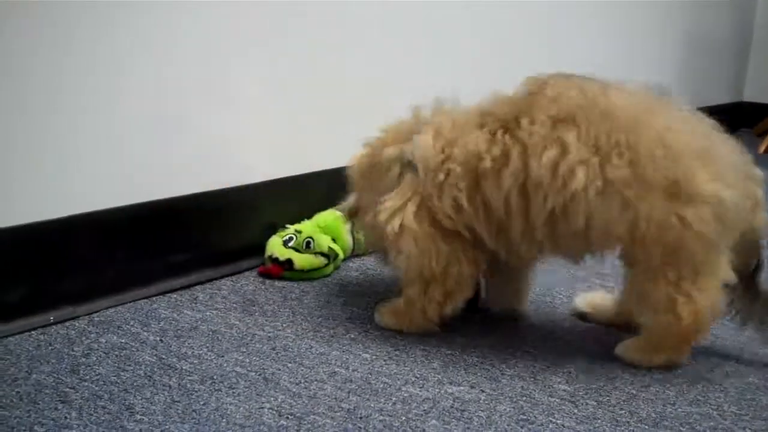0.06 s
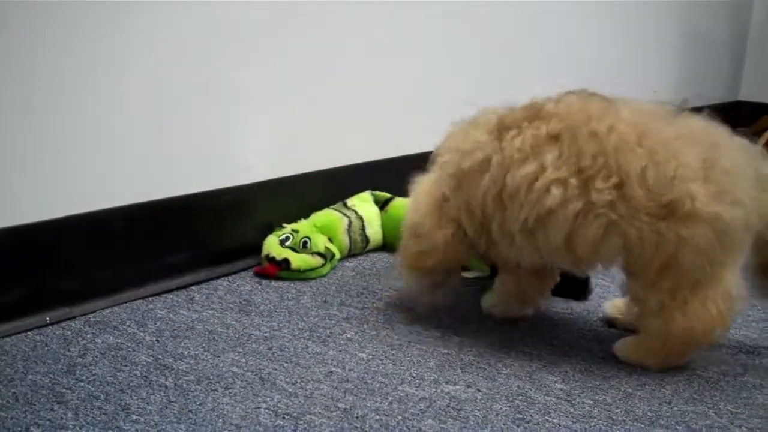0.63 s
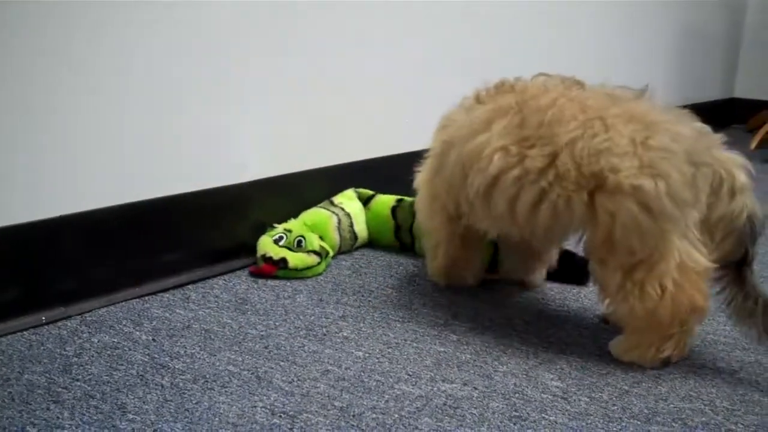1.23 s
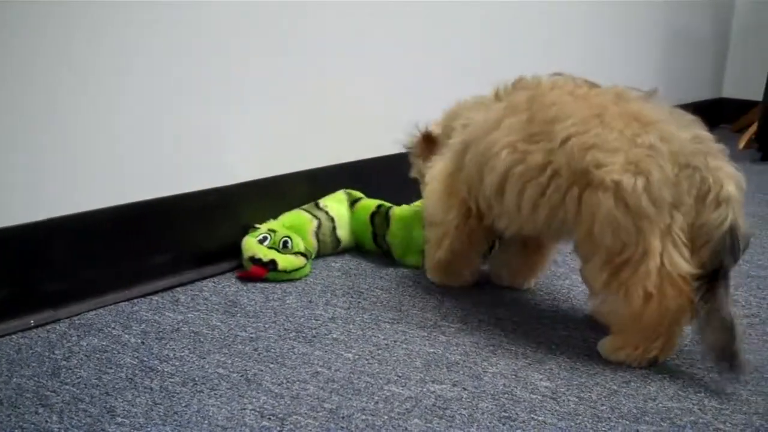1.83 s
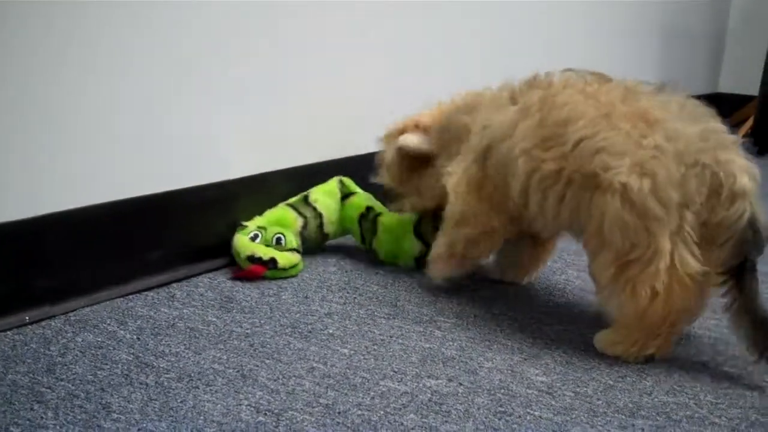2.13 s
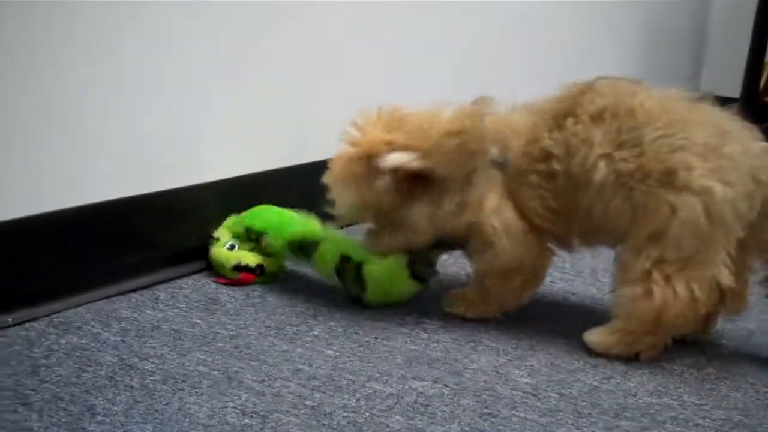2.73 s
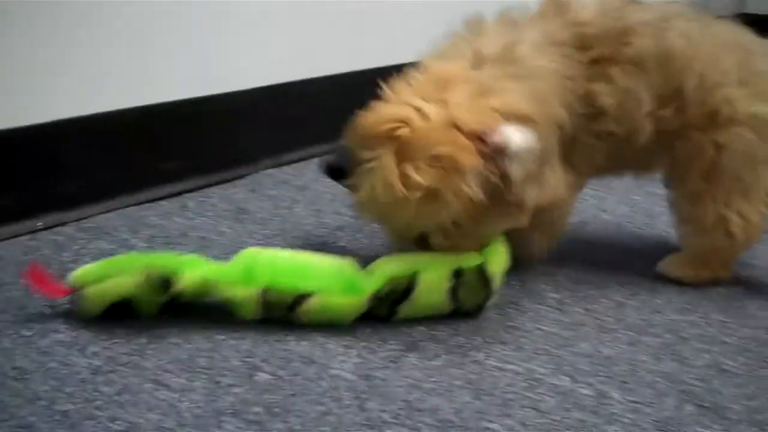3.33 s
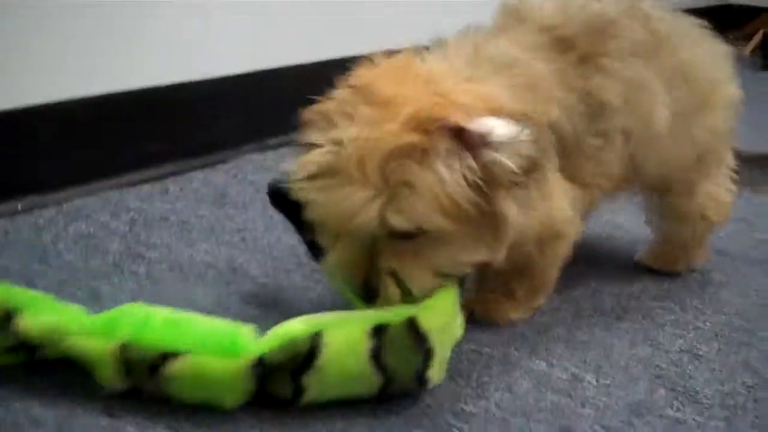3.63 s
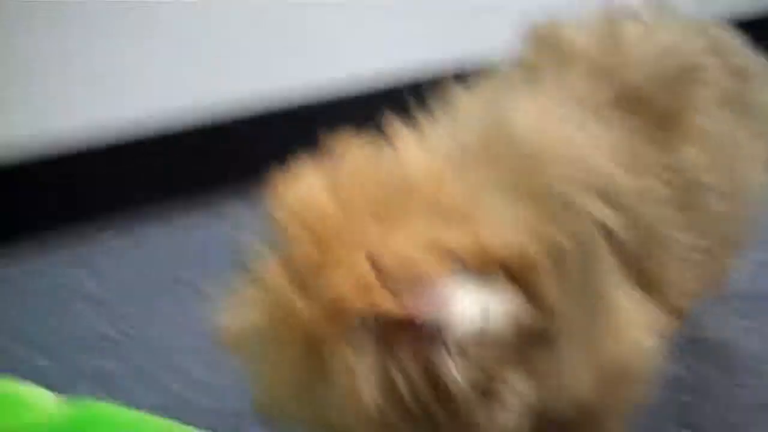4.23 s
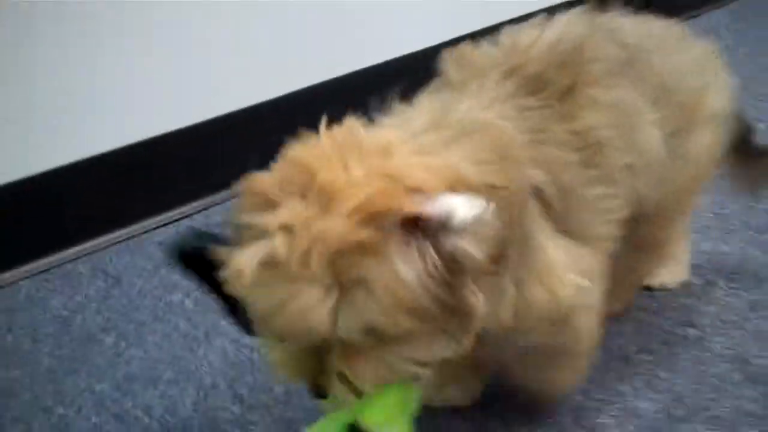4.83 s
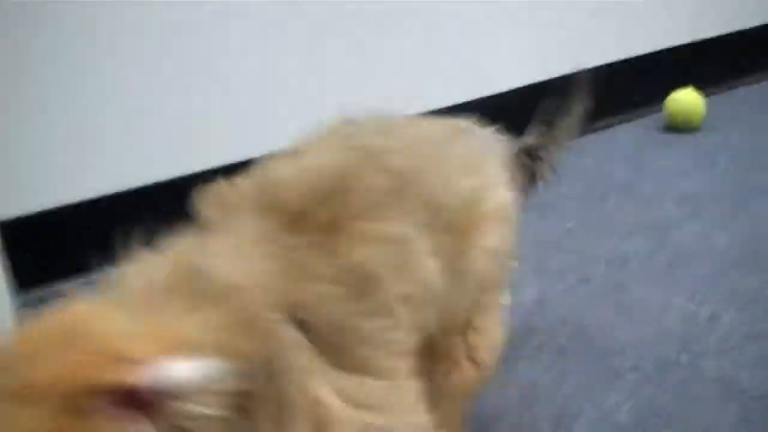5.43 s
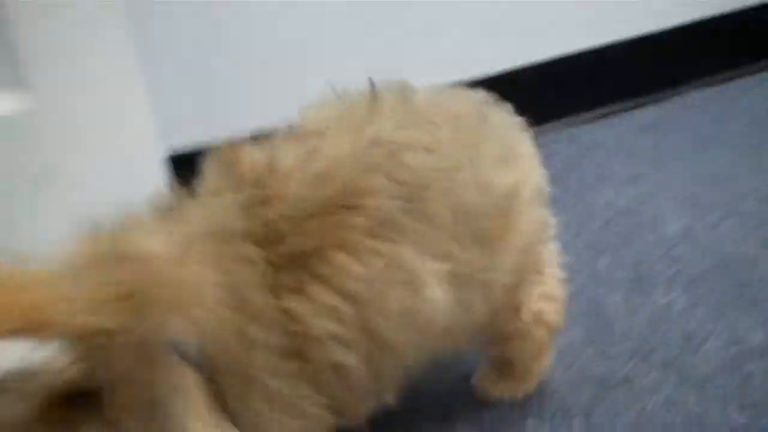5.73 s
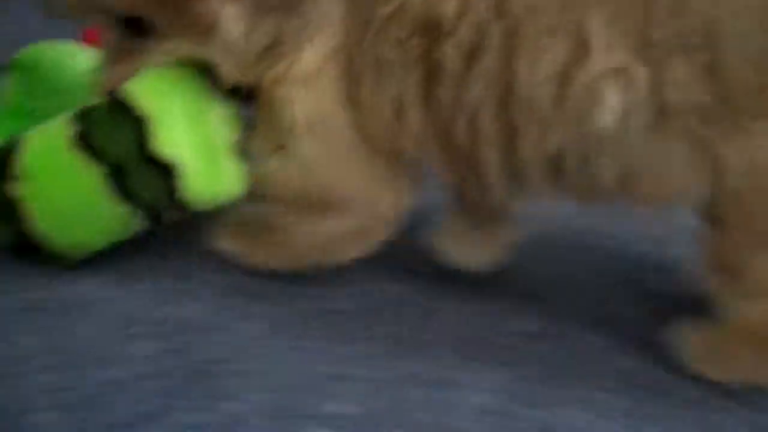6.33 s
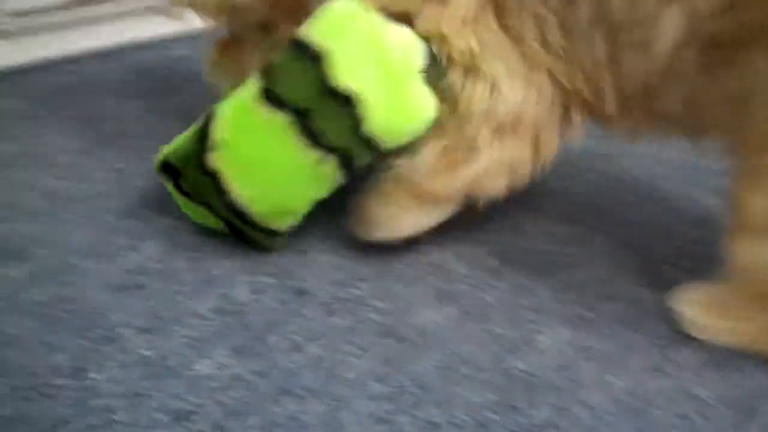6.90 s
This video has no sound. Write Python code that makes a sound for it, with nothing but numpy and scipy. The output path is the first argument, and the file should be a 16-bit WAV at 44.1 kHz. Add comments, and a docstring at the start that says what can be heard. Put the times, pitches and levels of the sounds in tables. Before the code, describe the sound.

Short reedy squeaks come in an uneven run as a puppy bites a plush toy, clicking its teeth and shuffling on carpet.

```python
"""A puppy chews a plush snake on the carpet of a small room, coming closer to a hand-held camera.
From the start ventilation hums and plush rubs the carpet, with faint ticks and short breathy rasps;
then a paw lands. From 1.3 s each bite drives air through the toy's reed in a short low squeak; after
some bites the bulb draws air back in a higher, longer one. Teeth begin to click near 3 s, the reed snaps
at 5.2 s, and the mouth smacks around the last bite. Rubbing, rasps and a last click end the scene."""
import sys
import numpy as np
from scipy import signal
from scipy.fft import rfft, irfft
from scipy.io import wavfile
from scipy.ndimage import uniform_filter1d

SR = 44100
rng = np.random.default_rng(int(sys.argv[2]) if len(sys.argv) > 2 else 0)


def digitize_waveform(pressure):
    """Quantize a signal to 16-bit integers and store it at the path in sys.argv[1].

    Rows of a 2-D input are taken as channels; values are limited to [-1, 1].
    """
    field = np.atleast_2d(pressure).T
    bounded = np.clip(field, -1, 1)
    quanta = np.round(bounded * 32767).astype(np.int16)
    wavfile.write(sys.argv[1], SR, quanta)


N = 315756
T = np.arange(N) / SR

# Spectrum of the room's steady air. Each row: frequency in Hz, relative level in dB.
AIR_SPECTRUM = [(12, -9.5), (25, -11.5), (50, -1), (80, 0.5), (120, -6), (170, -10.5), (310, -10),
                (700, -11.5), (1200, -15.5), (2200, -20), (3200, -24.5), (7500, -23.5), (10000, -31.5),
                (14000, -32.5)]
# Hum lines. Each row: frequency in Hz, level in dB.
HUM_LINES = [(78, -68), (86, -66), (240, -72), (490, -70.5), (2223, -76.5), (4317, -71.5), (4500, -95),
             (7494, -79)]
# The rumble varies across the room. Each row: time in seconds, bass gain in dB.
RUMBLE_GAIN = [(0, -2), (1.6, -2.5), (2.4, 1.5), (4.2, 0.5), (5.3, -3.5), (7.1, -6.5)]
# Spectrum of plush on carpet. Each row: frequency in Hz, relative level in dB.
RUB_SPECTRUM = [(100, -22), (250, -14), (450, -6), (950, -10.5), (2200, -9), (3500, -12), (6000, -5.5),
                (7600, -8.5), (9500, -24), (14000, -35)]
# Shuffling grows as the puppy gets busy and comes near. Each row: time in seconds, level in dB.
SHUFFLE_LEVEL = [(0, -59.5), (1.1, -76), (1.25, -57), (2.4, -54.5), (3.1, -53.5), (5.0, -48.5),
                 (6.5, -53.5)]
# Drags of the toy, then paw falls. Each row: centre in seconds, half length in seconds, level in dB.
TOY_DRAGS = [(5.57, 0.24, -53), (6.125, 0.25, -54.5), (6.715, 0.06, -48), (7.1, 0.089, -41.5)]
PAW_FALLS = [(0.736, 0.016, -48.5)]
# Faint ticks and breathy rasps, clicks of the teeth and the snap of the reed.
# Each row: start in seconds, peak in dB, decay time of the noise burst in ms (0.1 at least is used).
TICKS_AND_RASPS = [(.0805, -30.5, 2), (.092, -43, -3), (.55, -45, 19), (.743, -38, 19), (.765, -39, 23),
                   (2.145, -35.5, 119), (2.505, -33.5, 49), (4.3256, -29, 2), (4.4109, -22.5, 4),
                   (4.424, -32, 6), (4.4613, -28, 13), (5.263, -29, 42), (5.2859, -21, 16),
                   (5.2944, -19.5, 3), (5.307, -14, 7), (5.321, -26, 21), (5.3757, -20, 0),
                   (5.9923, -34, 2), (6.012, -34, 13), (6.6418, -18, 4), (6.654, -32, 12), (6.666, -29, 11),
                   (6.692, -38, 12), (6.755, -37.5, 25), (7.1332, -29.5, 20)]
TOOTH_CLICKS = [(3.1348, -25, 3.5), (3.243, -38, 1), (3.2545, -29.5, 1.5), (3.2864, -25.5, 7),
                (3.9379, -26.5, 3), (3.9948, -39, 18), (5.4945, -29, 9), (5.561, -26.5, 3),
                (5.5755, -27, -1), (5.580, -25, -0.5), (5.5905, -20.5, 0), (5.875, -34, 9),
                (5.9105, -18, 1.5), (7.05, -25.5, 0)]
REED_SNAPS = [(5.1728, 9.5, 1.1)]
# The modes they excite. Each row: frequency in Hz, time to fall 60 dB in seconds, relative level in dB.
RASP_MODES = [(2200, .022, 1), (2370, .022, 1.5), (3220, .008, -7), (4520, .012, 2), (5250, .007, 5),
              (6020, .0055, 7), (7220, .007, 6), (9000, .0024, -19.5)]
TOOTH_MODES = [(4000, 0.002, 0), (6000, 0.0026, 8), (7220, 0.0088, -1.5), (10640, 0.0034, -28)]
REED_MODES = [(724, 0.012, -27), (1530, 0.0057, -44), (3574, 0.018, -9), (5050, 0.01, -10),
              (6340, 0.0066, -2), (6740, 0.0067, 3.5), (7920, 0.034, -21), (9400, 0.0034, -25)]
# Bites. Each row: start in seconds, length in seconds, top reed rate in Hz, its sag in Hz, moment of
# hardest squeeze as a share of the length, gains of buzz, lower and upper pipe mode in dB, fade in dB,
# lower and upper mode in Hz, whistle mode relative to the upper in dB, echo delay in ms, echo share
# (0.7 at most is used), left minus right near the pipe modes in dB.
BITES = [(1.284, 0.048, 388.7, 28.8, 0.29, -38.5, -24.5, -31.5, 5.5, 4980, 6200, -18, 0.53, 0.3, -11),
         (1.549, 0.03, 390.4, 21.4, 0.23, -36, -22.5, -30, 1, 5050, 6160, -5.5, 0.49, .35, -7),
         (1.895, .036, 394.2, 31.3, 0.08, -33.5, -19.5, -26, 9.5, 5070, 6300, -12, .51, .51, -10),
         (2.2161, 0.045, 399.2, 46.3, 0.11, -31.5, -19, -29.5, 13.5, 5060, 6400, -2.5, .55, 0.38, -6.5),
         (2.5304, 0.032, 402, 44.4, 0, -29, -21.5, -24, 11, 5280, 5900, -17, .57, 0.46, -8),
         (2.734, 0.037, 392, 24, 0.41, -31, -19.5, -35.5, 4, 5200, 6850, -6, 0.71, 0.44, -5.5),
         (3.3014, 0.047, 411, 57.8, 0.28, -30.5, -16.5, -15.5, 8.5, 5350, 6160, -9, 1.62, .2, -12),
         (3.5944, 0.024, 396, 37.3, 0.06, -30, -14, -17.5, 10.5, 5340, 6300, -9, .67, .11, -9),
         (4.0219, .036, 412, 59, 0.28, -25.5, -12, -11, 10, 5330, 6020, -12.5, 1.49, 0.1, -6),
         (4.1378, .028, 387.4, 22.2, 0.18, -30, -11, -17.5, 4, 5380, 5970, -12, 1.07, 0.08, -4.5),
         (4.5365, 0.045, 396.5, 43, 0.29, -27, -15.5, -18, 8, 5520, 6100, -7, 0.56, 0, -8),
         (5.6923, 0.033, 386.5, 29.3, 0.02, -27.5, -14.5, -15, 12.5, 4920, 5310, -13.5, 0.366, 0.78, -6)]
# Refills. Each row: as for a bite, but the fifth column is the time in seconds for suction to halve.
REFILLS = [(1.3761, 0.046, 473.5, 39, 0.017, -36, -25, -24.5, 7.7, 5420, 6800, -19, 0.635, .15, -13),
           (1.621, 0.068, 491, 62.5, .025, -29.5, -13.5, -21, 18, 5710, 6150, -2, 0.458, 0.34, -10.5),
           (1.989, 0.066, 459, 30, 0.039, -35.5, -22.5, -25, 8.5, 5600, 7000, -19, .63, .17, -11),
           (2.8027, 0.11, 491.8, 65.2, 0.062, -24.5, -9.5, -21, 17.4, 5720, 6250, -4.5, 0.92, 0.22, -8.5),
           (3.6437, 0.14, 513.6, 51.4, .036, -24.5, -6.5, -12, 18.4, 5800, 6130, -7.5, 0.41, 0.064, -7),
           (4.792, 0.1895, 503, 61.5, .041, -28, -5, -18, 21.5, 5284, 6430, -3, 0.32, 0.43, -8.5)]
# The jaw loosens and a refill swells. Each row: centre in seconds, half length in seconds, gain in dB.
REFILL_SWELLS = [(3.727, 0.021, 2.5), (4.912, 0.024, 5.5), (4.967, 0.014, 8.5)]
# Reed buzz with air going out and coming in. Each row: frequency in Hz, relative level in dB.
BUZZ_OUT = [(120, -18), (400, -1.5), (1200, 0), (2000, 1), (2800, 3), (3400, 1), (3900, -2.5), (5000, -44),
            (9000, -15), (10800, -46), (14000, -19), (16000, -41.5)]
BUZZ_IN = [(150, -18), (460, -6.5), (1200, -2.5), (2000, -1), (3000, -5), (3600, -21.5), (4100, -25),
           (5000, -30), (9000, -31), (10300, -20.5), (11800, -25), (14000, -31), (16000, -46)]
# The room's share falls as the puppy nears. Each row: time in seconds, relative level in dB.
ROOM_SHARE = [(1.3, -8), (2.0, -9), (2.6, -13.5), (3.3, -10), (3.7, -10), (4.1, -18.5), (4.6, -15),
              (5.0, -9.5), (5.2, -26), (5.7, -20.5)]
# Room decay. Each row: low and high band edge in Hz, reverberation time in seconds, relative level in dB.
ROOM_BANDS = [(180.6, 1270, 0.28, 7.5), (1180, 4300, 0.2, 3.5), (4860, 5740, 0.26, 2.5),
              (7450, 31000, 0.2, 2.5)]
# Wet smacks. Each row: start in seconds, level in dB, nominal pitch in Hz, time to fall 60 dB in seconds.
MOUTH_SMACKS = [(5.494, -29.5, 1560, 0.007), (5.5869, -28, 830, 0.0061), (5.617, -34, 810, 0.011),
                (5.652, -32, 1070, 0.0053), (5.878, -39, 1040, 0.021), (5.911, -18, 1680, 0.012),
                (5.912, -29.5, 1000, 0.018)]

PIPE_WIDTH_HZ, WHISTLE_HZ, WHISTLE_WIDTH_HZ = 399, 7350, 414
SUCTION_PEAK_S, COLLAPSE_S, COLLAPSE_SHARE = 0.00934, 0.0067, 0.48
RELEASE_S, OVERRUN_S = 0.01, 0.0052  # the tone tapers and stops a little after the air runs out
SWELL_HZ_PER_DB, TREBLE_PAN_DB = 0.55, 10.5


def amp(db):
    """Amplitude ratio of a level in decibels."""
    return 10 ** (np.asarray(db) / 20)


def unit(x):
    """Normalisation to an rms of 1."""
    return x / np.sqrt(np.mean(x ** 2) + 1e-20)


def curve(rows, t):
    """Linear interpolation of (time, value) rows."""
    return np.interp(t, *np.transpose(rows))


def colour(points, hz):
    """Gain of a (Hz, dB) spectrum, interpolated in log frequency."""
    f, db = np.transpose(points)
    return amp(np.interp(np.log(hz + 1), np.log(f), db))


def bump(t, at, half):
    """Gaussian pulse of height 1."""
    return np.exp(-((t - at) / half) ** 2)


def add(out, start_s, x):
    """Superposition of a sound from its start time."""
    i = int(start_s * SR)
    out[..., i:i + x.shape[-1]] += x[..., :N - i]


def minimum_phase(gain):
    """Folding the cepstrum gives the promptest impulse response with this gain."""
    cepstrum = irfft(np.log(gain + 1e-9))
    half = len(cepstrum) // 2
    cepstrum[1:half] *= 2
    cepstrum[half + 1:] = 0
    return irfft(np.exp(rfft(cepstrum)))


def wander(rate, size):
    """Smoothed noise that changes about rate times a second."""
    k = max(int(SR / rate), 1)
    return unit(uniform_filter1d(uniform_filter1d(rng.standard_normal(size), k), k))


def stereo_noise(points, side):
    """Coloured noise whose channels are less correlated in the treble."""
    hz = np.fft.rfftfreq(N, 1 / SR)
    mid, apart = rfft(rng.standard_normal((2, N))) * colour(points, hz)
    apart = apart * side * (1 + np.minimum(hz / 4000, 1))
    return unit(irfft(np.array([mid + apart, mid - apart]), N))


def ventilation():
    """Broadband rumble is superposed on a line spectrum of wavering hum."""
    air = amp(-54) * stereo_noise(AIR_SPECTRUM, side=0.36)
    for hz, db in HUM_LINES:
        level = amp(db + 2 * wander(3.4, N)) * np.sqrt(2)
        air += level * np.sin(2 * np.pi * np.cumsum(hz + 4 * wander(12.55, N)) / SR)
    rumble = signal.sosfiltfilt(signal.butter(2, 119, fs=SR, output="sos"), air)
    return air + rumble * (amp(curve(RUMBLE_GAIN, T)) - 1)


def rubbing():
    """Friction noise flickers as fibres catch and let go; shuffling and drags add in power."""
    power = amp(curve(SHUFFLE_LEVEL, T)) ** 2
    power += sum((amp(db) * bump(T, at, half)) ** 2 for at, half, db in TOY_DRAGS)
    flicker = amp(1.9 * wander(25, N) + 1.5 * wander(400, N))
    return stereo_noise(RUB_SPECTRUM, side=0.45) * np.sqrt(power) * flicker


def ringing_bursts(rows, modes, low_cut_hz, grit, pan_db):
    """Modal response: an impulse and a dying burst of noise ring the same damped modes."""
    out, t = np.zeros((2, N)), np.arange(SR // 8) / SR
    ring = sum(amp(db - 60 * t / t60) * np.sin(2 * np.pi * hz * t) for hz, t60, db in modes)
    # small things radiate little bass
    ring = signal.sosfilt(signal.butter(3, low_cut_hz, "high", fs=SR, output="sos"), ring)
    for start_s, db, decay_ms in rows:
        noise = rng.standard_normal((3, len(t)))
        dying = np.exp(-1000 * t / max(decay_ms, .1))
        force = grit * (noise[0] + 0.86 * noise[1:]) * dying
        force[:, 0] += 1  # the impulse
        sound = signal.fftconvolve(force, ring[None], axes=1)
        add(out, start_s, sound * amp(db + np.array([[pan_db], [-pan_db]]) / 2) / abs(sound).max())
    return out


def ticks_and_rasps():
    """Noise-excited resonance: faint ticks and short breathy rasps ring near 2.3 kHz and above."""
    return ringing_bursts(TICKS_AND_RASPS, RASP_MODES, low_cut_hz=2300, grit=0.77, pan_db=1.0)


def paw_fall():
    """The soft impact of a padded foot gives a short pulse of low-frequency noise."""
    band = signal.butter(2, [140, 282], "band", fs=SR, output="sos")
    thud = unit(signal.sosfilt(band, rng.standard_normal(N)))
    return thud * sum(amp(db) * bump(T, at, half) for at, half, db in PAW_FALLS)


def squeeze_loss(t, length, hardest):
    """Share of pressure lost in a bite: pressure follows a parabola that peaks early."""
    return ((t / length - hardest) / (1 - hardest)) ** 2


def suction_loss(t, length, halving_s):
    """Loss of suction by elastic recovery: the bulb springs back, draws on gently, then is full."""
    relaxed = ((t - SUCTION_PEAK_S) / halving_s) ** 2
    return relaxed / (1 + relaxed) + COLLAPSE_SHARE * np.exp((t - length) / COLLAPSE_S)


def pipe(drives, buzz, notch, lower_hz, upper_hz, whistle_db, echo_ms, echo_share, pan_db):
    """Resonance and interference in the short pipe filter the reed's pulses on their way to each port."""
    hz = np.fft.rfftfreq(1024, 1 / SR)
    mode = lambda centre, width: 1 / (1 + ((hz - centre) / width) ** 2)
    whistle = amp(whistle_db) * mode(WHISTLE_HZ, WHISTLE_WIDTH_HZ)
    upper = np.hypot(mode(upper_hz, PIPE_WIDTH_HZ), whistle)
    shapes = [colour(buzz, hz), mode(lower_hz, PIPE_WIDTH_HZ), upper]
    # the pipe cancels one band
    notch_hz, notch_width_hz, notch_db = notch
    hollow = amp(notch_db * bump(hz, notch_hz, notch_width_hz))
    # an echo off the floor or wall combs the tone
    comb = abs(1 + np.clip(echo_share, 0, .7) * np.exp(-2j * np.pi * hz * echo_ms / 1000))
    # the left microphone port hears more of the top
    pan = amp(np.interp(hz, [4230, 6150, 6550, 6770, 9000, 12300],
                        [-.5, pan_db, -.6, TREBLE_PAN_DB, TREBLE_PAN_DB, 2]))
    ports = np.array([pan, np.ones_like(pan)]) * comb * hollow * np.sqrt(2 / (1 + pan ** 2))
    return np.array([sum(signal.fftconvolve(drive, minimum_phase(shape * port))
                         for drive, shape in zip(drives, shapes)) for port in ports])


def squeak(row, loss, buzz, notch, fade_factors, jitter, shimmer_db, hiss_db, attack_s, stall_s):
    """A reed slaps shut once a cycle, making a pulse train whose rate and level sink with pressure."""
    start_s, length, top_hz, sag_hz, timing, buzz_db, lower_db, upper_db, fade_db, *pipe_settings = row
    t = np.arange(int((length + .006) * SR)) / SR
    lost = loss(np.minimum(t, length), length, timing)
    swell_db = sum(db * bump(start_s + t, at, half) for at, half, db in REFILL_SWELLS)
    rate = top_hz - sag_hz * lost + SWELL_HZ_PER_DB * swell_db
    # the reed grows unsteady as the air runs out
    stalling = np.exp(np.minimum(t - length, 0) / stall_s)
    rate *= 1 + jitter * (1 + 5 * stalling) * wander(410, len(t))
    phase = 2 * np.pi * (np.cumsum(rate) / SR - .1)
    slaps = sum(np.cos(k * phase) for k in range(1, 40))
    leak = amp(hiss_db) * (1 + np.cos(phase)) * rng.standard_normal(len(t))
    attack = 1 - .7 * np.exp(-t / attack_s)
    release = np.clip((length + OVERRUN_S - t) / RELEASE_S, 0, 1)
    flow = (slaps + leak) * attack * release
    faded_db = fade_db * lost * (t > t[lost.argmin()])  # only after the pressure peak
    # no two slaps share their force alike between the buzz and the modes
    drives = [flow * amp(db - factor * faded_db + swell_db + shimmer_db * wander(170, len(t)))
              for db, factor in zip((buzz_db, lower_db, upper_db), fade_factors)]
    return pipe(drives, buzz, notch, *pipe_settings)


def squeaker():
    """Pressure drives the reed both ways: bites push air out; suction draws it in with a cleaner tone."""
    out = np.zeros((2, N))
    for row in BITES:
        sound = squeak(row, squeeze_loss, BUZZ_OUT, notch=(3400, 280, -3), fade_factors=(1, 0.38, 1),
                       jitter=0.0054, shimmer_db=1.86, hiss_db=-10.5, attack_s=0.0018, stall_s=0.003)
        add(out, row[0], sound)
    for row in REFILLS:
        sound = squeak(row, suction_loss, BUZZ_IN, notch=(3960, 370, -9),
                       fade_factors=(0.79, 1.175, 0.62),
                       jitter=0.0021, shimmer_db=1.52, hiss_db=-14, attack_s=0.00067, stall_s=0.01)
        add(out, row[0], sound)
    # the sound reaches the left port a sample later
    return np.array([np.roll(out[0], 1), out[1]])


def reverberation(source, first_s, width):
    """Wall reflections form a diffuse tail; each band decays exponentially at its own rate."""
    t = np.arange(SR // 2) / SR
    noise = rng.standard_normal((3, len(t)))
    scatter = (noise[0] + width * noise[1:]) / np.sqrt(1 + width ** 2) * (t > first_s)
    tail = 0
    for low, high, t60, db in ROOM_BANDS:
        band = signal.butter(2, [low, min(high, .45 * SR)], "band", fs=SR, output="sos")
        tail += signal.sosfilt(band, scatter) * amp(db - 60 * t / t60)
    return signal.fftconvolve(source * amp(curve(ROOM_SHARE, T)), tail * amp(-26.5), axes=1)[:, :N]


def tooth_clicks():
    """Impacts of teeth and tongue on the toy excite high, heavily damped modes."""
    return ringing_bursts(TOOTH_CLICKS, TOOTH_MODES, low_cut_hz=530, grit=1.0, pan_db=6.5)


def reed_snap():
    """Impulse response: the reed snaps without squeaking and its modes ring freely."""
    return ringing_bursts(REED_SNAPS, REED_MODES, low_cut_hz=260, grit=0.13, pan_db=-1.5)


def mouth_smacks():
    """Cavity resonance: the small mouth pops and its damped note sags."""
    out, t = np.zeros((2, N)), np.arange(SR // 20) / SR
    for start_s, db, hz, t60 in MOUTH_SMACKS:
        pitch = hz * (0.75 + 0.33 * np.exp(-t / 0.0027))
        add(out, start_s, amp(db - 60 * t / t60) * np.sin(2 * np.pi * np.cumsum(pitch) / SR))
    return out


def scene():
    """The sources superpose; only squeaks, clicks, snap and smacks excite the room."""
    chewing = squeaker() + tooth_clicks() + reed_snap() + mouth_smacks()
    room = reverberation(chewing, first_s=0.0016, width=0.45)
    return ventilation() + rubbing() + ticks_and_rasps() + paw_fall() + chewing + room


def record(dry):
    """Saturation rounds the peaks that overload the input; a low-pass filter cuts the top."""
    rounded = dry / (1 + dry ** 16) ** (1 / 16)
    return signal.sosfiltfilt(signal.ellip(8, .1, 60, 14200, fs=SR, output="sos"), rounded)


dry = scene()
out = record(dry)
digitize_waveform(out)
```